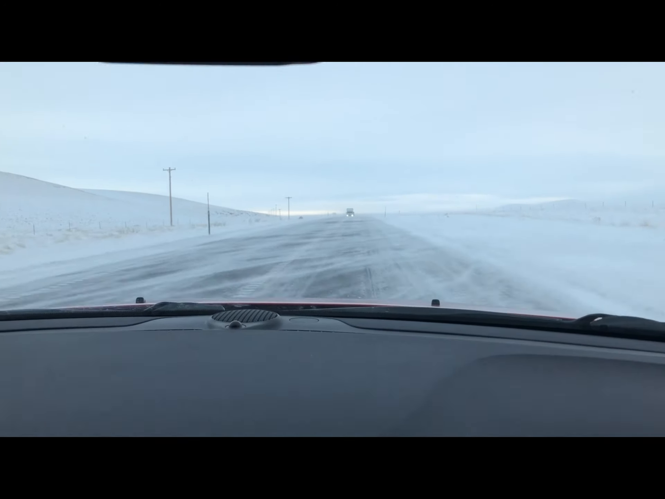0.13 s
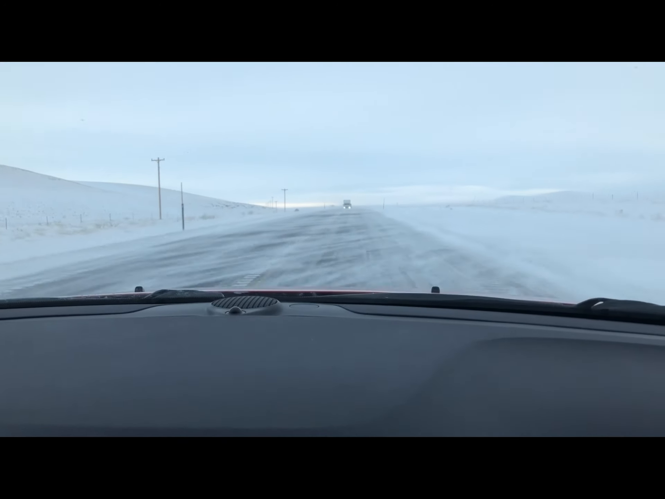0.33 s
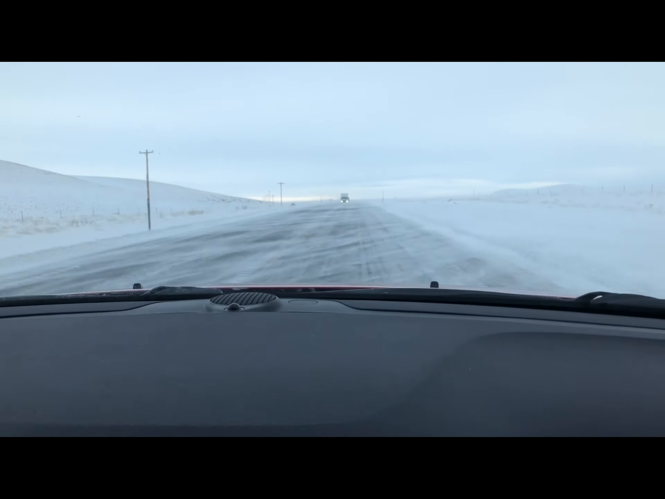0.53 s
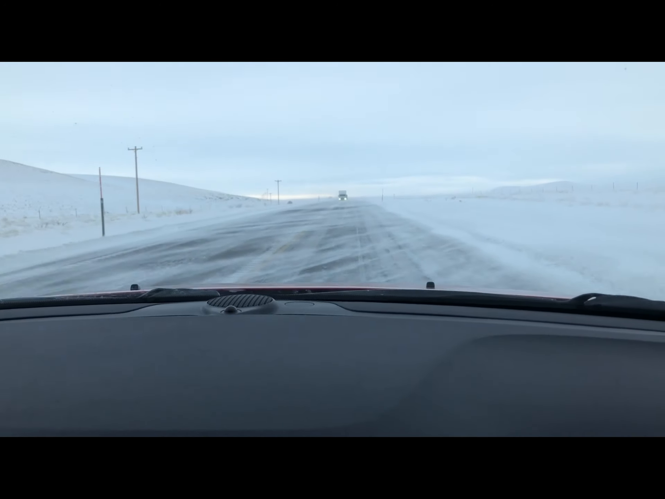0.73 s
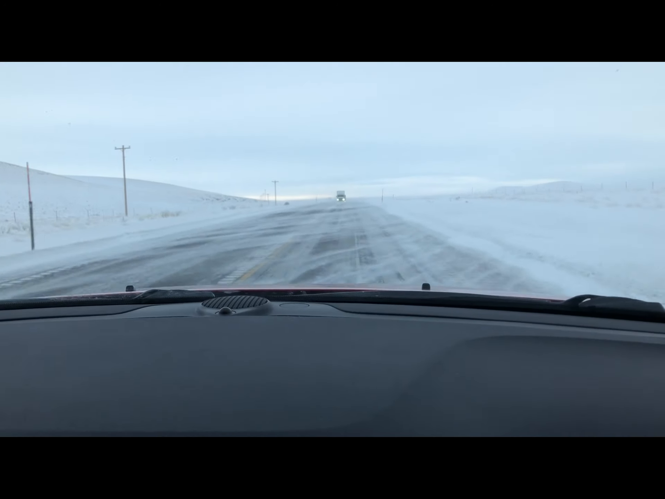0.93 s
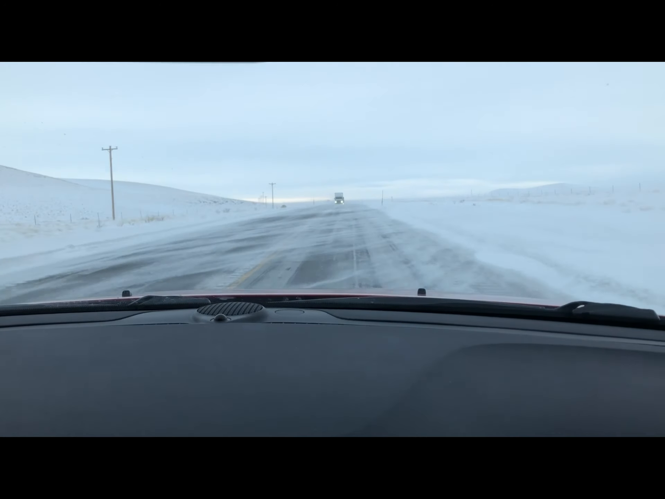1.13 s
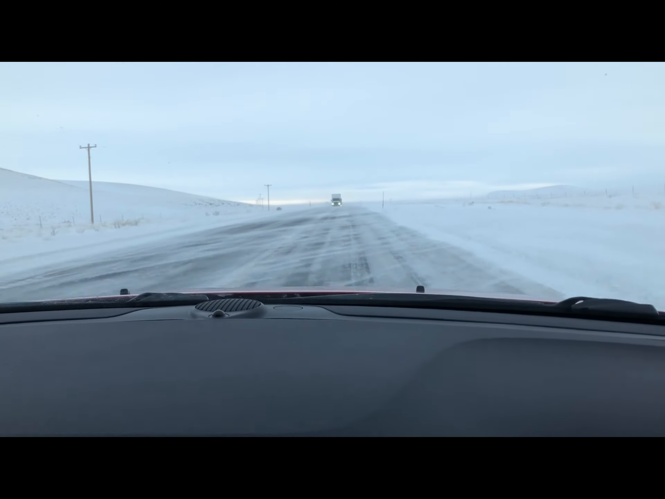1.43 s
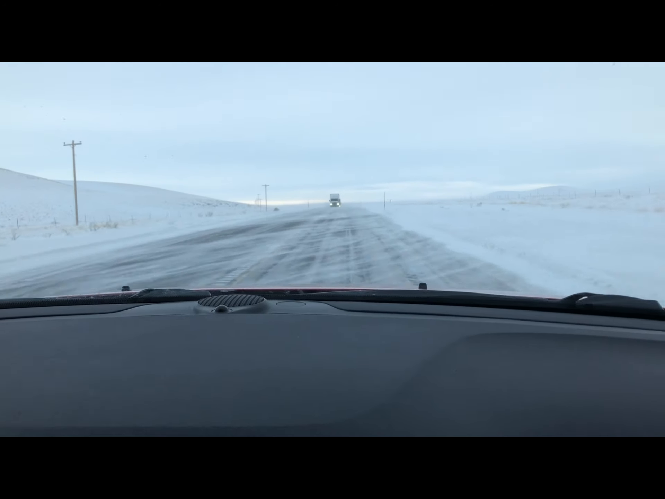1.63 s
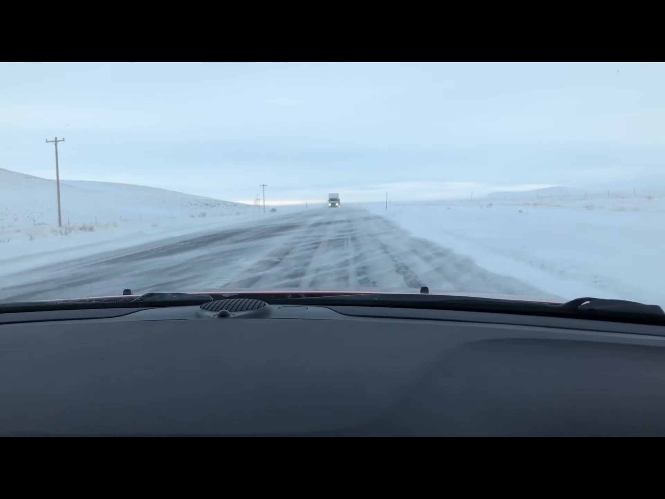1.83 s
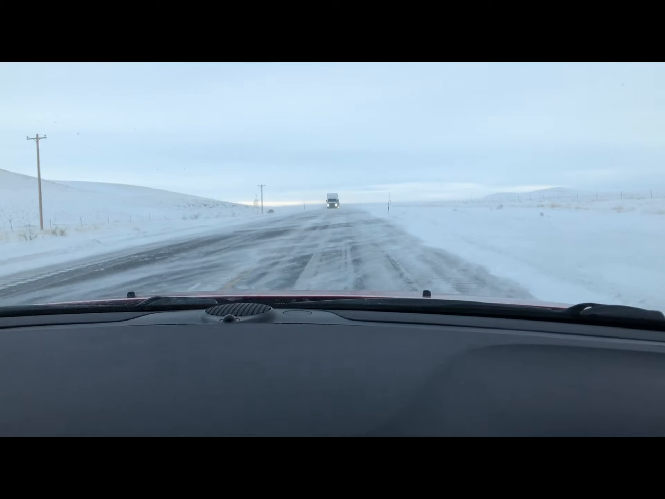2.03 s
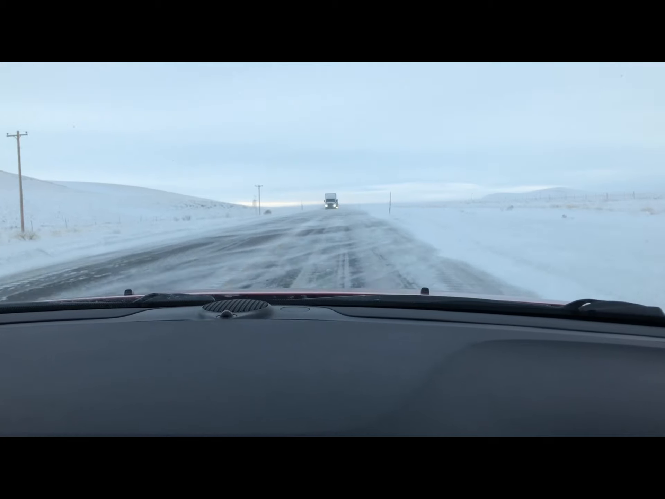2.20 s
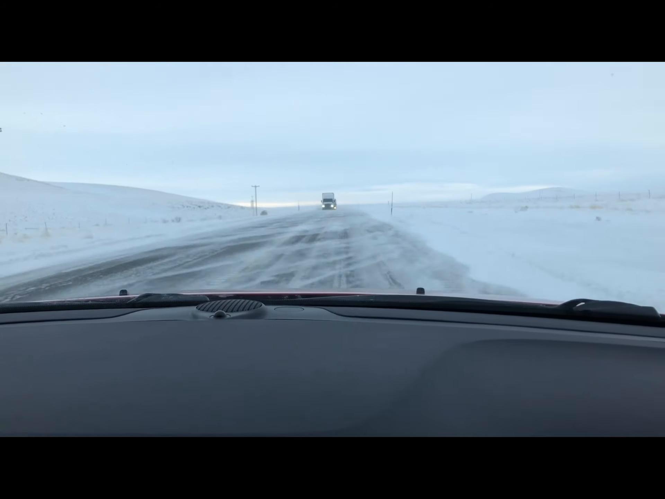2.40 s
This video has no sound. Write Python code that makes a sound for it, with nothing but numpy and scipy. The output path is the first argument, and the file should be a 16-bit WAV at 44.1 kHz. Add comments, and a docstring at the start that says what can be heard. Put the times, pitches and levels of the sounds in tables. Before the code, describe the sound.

Low road rumble fills the cabin of a cruising car, with muffled tyre noise and light wind around the windscreen. Soft bumps cluster in the first half, and a couple of tiny scuffs sound close to the microphone.

```python
"""Inside a car cruising on a snowy highway in wind.
The uneven road forces the body into a low boom, with heavier thuds at rough patches, and excites two
resonances of the cabin. The tyres roar through the floor; turbulent air rushes round the windscreen.
A few brief, crisp friction scuffs sound close by, perhaps trim or cloth shifting."""
import sys
import numpy as np
from scipy import signal
from scipy.fft import rfft, irfft
from scipy.io import wavfile
from scipy.ndimage import uniform_filter1d

SR = 44100
rng = np.random.default_rng(int(sys.argv[2]) if len(sys.argv) > 2 else 0)


def put_to_file(sound):
    """Save the sound as 16-bit audio at rate SR, in the file named by the first command-line argument."""
    columns = np.atleast_2d(sound).T  # one column per channel
    safe = np.clip(columns, -1, 1)
    whole_steps = np.round(safe * 32767)
    wavfile.write(sys.argv[1], SR, whole_steps.astype(np.int16))


N = 112896


def gain_of(db):
    """Amplitude grows tenfold for every 20 dB."""
    return 10 ** (np.asarray(db) / 20)


def unit_rms(x):
    """Normalisation to a mean power of 1."""
    return x / np.sqrt(np.mean(x ** 2) + 1e-20)


def response(spectrum, hz):
    """Amplitude response at hz, interpolated in dB along a logarithmic frequency axis."""
    points_hz, db = np.transpose(spectrum)
    return gain_of(np.interp(np.log(hz + 1), np.log(points_hz + 1), db))


def envelope(levels):
    """Amplitude envelope, interpolated in dB between points in time."""
    times_s, db = np.transpose(levels)
    return gain_of(np.interp(np.arange(N) / SR, times_s, db))


def add(mix, start_s, sound):
    """Superposition: a sound adds to the mix from its start onward."""
    part = mix[round(start_s * SR):][:len(sound)]
    part += sound[:len(part)]


def coloured(x, spectrum):
    """Linear filtering imposes a spectral shape; the result has rms 1."""
    hz = np.fft.rfftfreq(len(x), 1 / SR)
    return unit_rms(irfft(rfft(x) * response(spectrum, hz), len(x)))


def steadied(x, samples):
    """Division by the running rms takes the slow chance swells out of a noise."""
    return x / np.sqrt(uniform_filter1d(x ** 2, samples) + 1e-12)


def modulated_noise(patchy_db, flutter_db):
    """Random amplitude modulation of white noise: drifting patches, and a flutter common to all bands."""
    frames = dict(nperseg=512, noverlap=384)
    bands = signal.stft(rng.standard_normal(N), **frames)[2]
    across_bands = uniform_filter1d(rng.standard_normal(bands.shape), size=7, axis=0)
    patches = unit_rms(uniform_filter1d(across_bands, size=24, axis=1))
    flutter = unit_rms(uniform_filter1d(rng.standard_normal(bands.shape[1]), size=8))
    modulation = gain_of(patchy_db * patches + flutter_db * flutter)
    return signal.istft(bands * modulation, **frames)[1][:N]


def wind_rush():
    """Turbulence: eddies along the windscreen and door seals make a broadband hiss that slowly eases."""
    # Spectrum of the rushing air. Each row: frequency in Hz, relative density in dB.
    spectrum = [(300, -18), (1000, -5.5), (1500, 2.5), (1680, -4), (2080, 1), (2550, -2), (2850, -5),
                (3300, -4.5), (3900, -7.5), (4700, -15), (6000, -20), (6900, -26.5), (8200, -27),
                (10000, -30.5), (13000, -35), (15700, -30.5)]
    # Course of the wind. Each row: time in seconds, relative level in dB.
    levels = [(0, -45.5), (0.5, -46.5), (0.85, -45.5), (1.25, -48.5), (1.6, -46.5), (1.9, -48), (2.3, -48)]
    eddies = modulated_noise(patchy_db=1.0, flutter_db=0.72)
    return gain_of(0.5) * envelope(levels) * coloured(eddies, spectrum)


def scuff(db, edge_hz, lift_db, samples=4096):
    """Stick-slip friction: a short run of tiny slips excites a surface's resonances and dies away."""
    # Spectrum of the friction. Each row: frequency in Hz, relative density in dB.
    spectrum = [(1000, -9), (2500, 2), (3900, 1), (4800, -1), (6100, -4), (6900, 0), (7900, -1.5),
                (9000, -7), (12500, -5), (15700, 0)]
    # Resonances of the surface. Each row: centre in Hz, width in Hz, boost in dB.
    resonances = [(4860, 140, 10), (5590, 190, 3.5), (6620, 140, 3)]
    rise_s, hold_s, t60_s = 0.0039, 0.0026, 0.074
    slips_per_s, slip_share = 1400, 0.28  # share of the power; the rest is smooth hiss
    t, hz = np.arange(samples) / SR, np.fft.rfftfreq(samples, 1 / SR)
    slips = unit_rms(rng.standard_normal(samples) * (rng.random(samples) < slips_per_s / SR))
    hiss = rng.standard_normal(samples)
    friction = coloured(np.sqrt(slip_share) * slips + np.sqrt(1 - slip_share) * hiss, spectrum)
    low_pass = 1 / np.sqrt(1 + (hz / edge_hz) ** 10)
    shelf = response([(7000, 0), (12000, lift_db)], hz)
    peaks = gain_of(sum(boost / (1 + (2 * (hz - centre) / width) ** 2)
                        for centre, width, boost in resonances))
    rub = unit_rms(irfft(rfft(friction) * low_pass * shelf * peaks))
    rise = np.minimum(t / rise_s, 1)
    decay = np.exp(-np.log(1000) * np.maximum(t - rise_s - hold_s, 0) / t60_s)
    return gain_of(db) * rise * decay * rub


def tyre_roar():
    """Transmission loss: the floor muffles the noise of the tread on snowy asphalt."""
    # Spectrum of the roar in the cabin. Each row: frequency in Hz, relative density in dB.
    spectrum = [(60, -25), (120, -5.5), (165, 1), (240, -1), (305, -2), (350, -6), (420, -10), (490, -12.5),
                (570, -12.5), (660, -16.5), (760, -14.5), (900, -21), (1100, -21.5), (1450, -29.5),
                (1700, -29.5), (3000, -45.5), (8000, -73)]
    # Course of the roar. Each row: time in seconds, relative level in dB.
    levels = [(0, -28), (0.2, -29), (0.34, -28), (0.6, -29.5), (0.85, -28), (1.15, -30), (1.5, -29),
              (1.7, -30), (2.05, -29.5), (2.2, -31), (2.35, -30), (2.55, -29.5)]
    tread = modulated_noise(patchy_db=0.4, flutter_db=-0.38)
    return gain_of(0.4) * envelope(levels) * steadied(coloured(tread, spectrum), samples=7000)


def cabin_drone(levels, centre_hz, width_hz):
    """Resonance: driven at random by the road, a cabin mode rings in a narrow band, its pitch wavering."""
    hz = np.fft.rfftfreq(N, 1 / SR)
    resonance = 1 / (1 + (2 * (hz - centre_hz) / width_hz) ** 2)
    ringing = irfft(rfft(rng.standard_normal(N)) * resonance, N)
    return envelope(levels) * steadied(unit_rms(ringing), samples=2600)


def thud(db, samples=8192):
    """Transient excitation: one uneven patch gives the body a brief, heavier shake."""
    # Spectrum of the shake. Each row: frequency in Hz, relative density in dB.
    spectrum = [(18, -49), (33, -11), (60, -3), (95, -8), (125, -15), (200, -30), (700, -95)]
    rise_s, hold_s, release_s = 0.0085, 0.0128, 0.029
    corners_s = np.cumsum([0, rise_s, hold_s, release_s])
    pulse = np.interp(np.arange(samples) / SR, corners_s, [0, 1, 1, 0])
    shake = coloured(rng.standard_normal(samples), spectrum)
    return gain_of(db) * pulse * steadied(shake, samples=1500)


def body_boom():
    """Forced vibration: the uneven road shakes the body and the air it encloses."""
    # Spectrum of the boom. Each row: frequency in Hz, relative density in dB.
    spectrum = [(15, -58), (25, -27), (31, -3), (46, -6), (66, 0.5), (80, -5), (93, -2), (122, -3),
                (145, -10.5), (250, -33.5), (600, -84)]
    # Course of the boom. Each row: time in seconds, relative level in dB.
    levels = [(0, -29.5), (0.18, -26), (0.4, -27.5), (0.7, -29), (0.95, -27.5), (1.15, -30), (1.45, -27.5),
              (1.9, -27.5), (2.15, -28.5), (2.55, -28.5)]
    vibration = coloured(rng.standard_normal(N), spectrum)
    return gain_of(1) * envelope(levels) * steadied(vibration, samples=3600)


def scene():
    """The pressures of all sources superpose at one point behind the dashboard."""
    # Scuffs close by. Each row: start in seconds, level in dB, treble edge in Hz, treble lift in dB.
    scuffs = [(0.4755, -40, 19000, -3.5), (0.524, -54, 8200, 2), (0.928, -64, 14000, 1),
              (1.416, -49, 19000, 2.6)]
    # Tyres striking uneven patches. Each row: start in seconds, level in dB.
    thuds = [(0.094, -25), (0.266, -20.5), (0.296, -20.5), (0.551, -21), (0.617, -22), (0.716, -20),
             (0.837, -20), (1.016, -23), (1.17, -22.5), (2.115, -25)]
    # Course of the upper cabin mode. Each row: time in seconds, level in dB.
    upper_levels = [(0, -40), (0.5, -39), (0.75, -30), (1.0, -31), (1.2, -36), (1.5, -30.5), (2.0, -39),
                    (2.4, -33)]
    # The deeper mode, strong over the first rough stretch. Each row: time in seconds, level in dB.
    deep_levels = [(0, -27), (0.31, -27.5), (0.38, -42), (2.55, -49)]
    cabin = body_boom() + tyre_roar() + wind_rush()
    for start_s, db, edge_hz, lift_db in scuffs:
        add(cabin, start_s, scuff(db, edge_hz, lift_db))
    for start_s, db in thuds:
        add(cabin, start_s, thud(db))
    cabin += cabin_drone(upper_levels, centre_hz=93, width_hz=21.4)
    cabin += cabin_drone(deep_levels, centre_hz=66.4, width_hz=17)
    return cabin[None]


def record(dry):
    """Band limiting: steep filters remove the deepest bass and highest treble; the onset fades in."""
    low_cut_hz, high_cut_hz, fade_in_s = 29, 15850, 0.006
    hz = np.fft.rfftfreq(2 * N, 1 / SR)
    high_pass = 1 / np.sqrt(1 + (low_cut_hz / (hz + 1)) ** 20)
    filtered = irfft(rfft(dry, 2 * N) * high_pass)[:, :N]
    fade_in = np.minimum(np.arange(N) / SR / fade_in_s, 1)
    low_pass = signal.firwin(1023, high_cut_hz, window=("kaiser", 9), fs=SR)
    return signal.oaconvolve(filtered * fade_in, low_pass[None], "same")


dry = scene()
out = record(dry)
put_to_file(out)
```